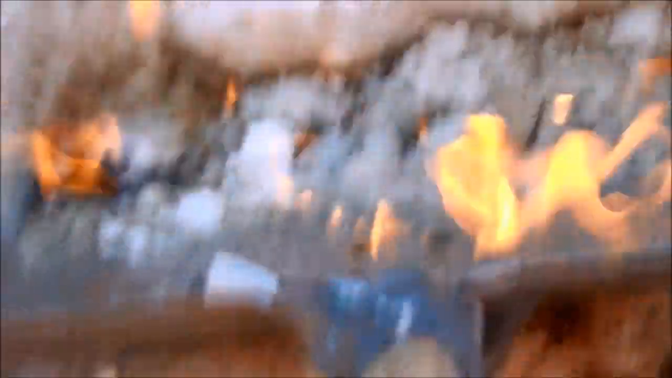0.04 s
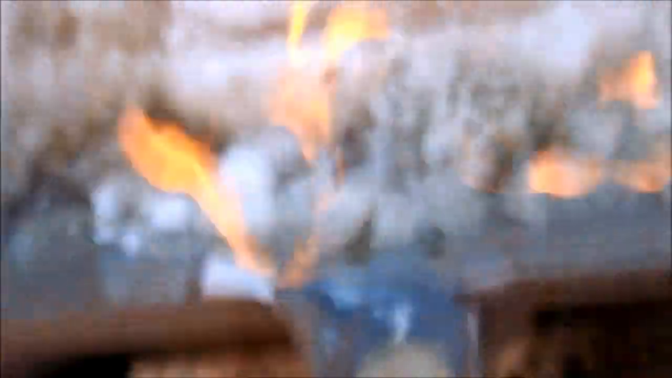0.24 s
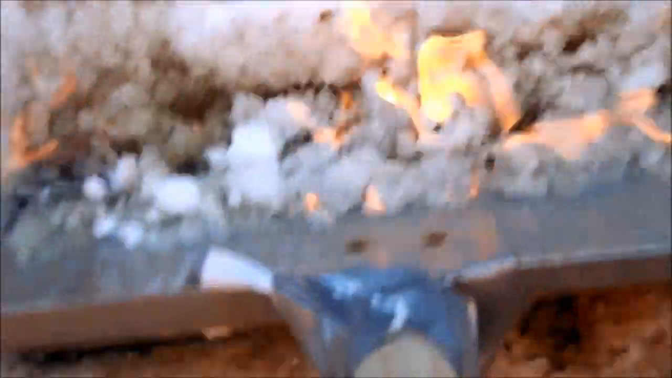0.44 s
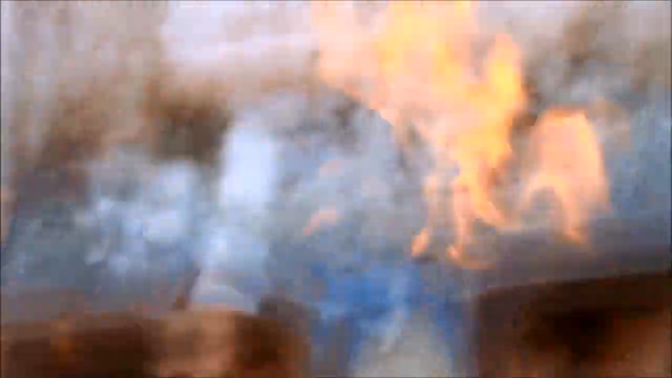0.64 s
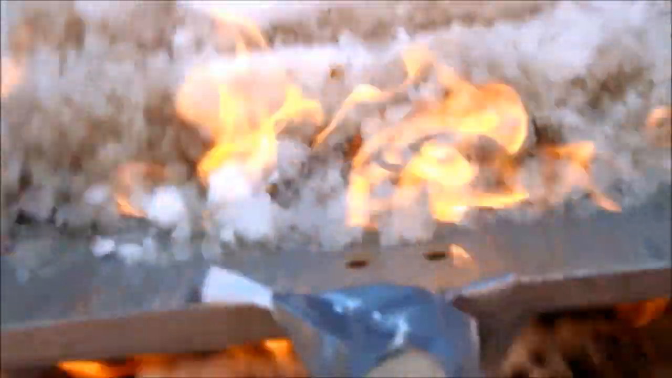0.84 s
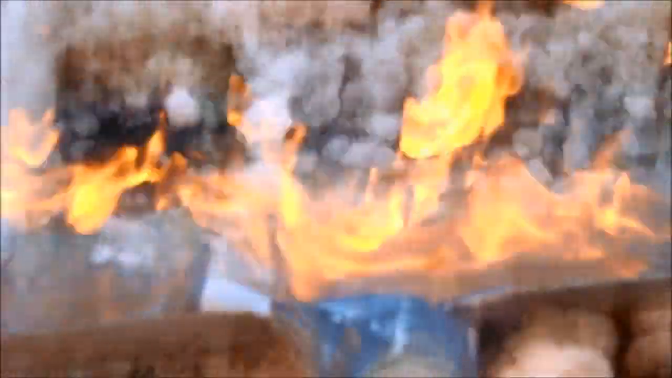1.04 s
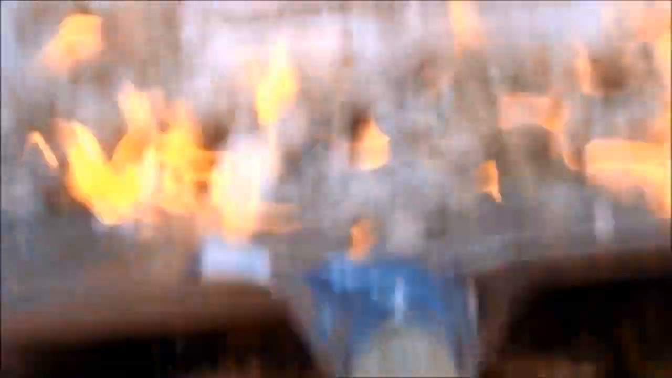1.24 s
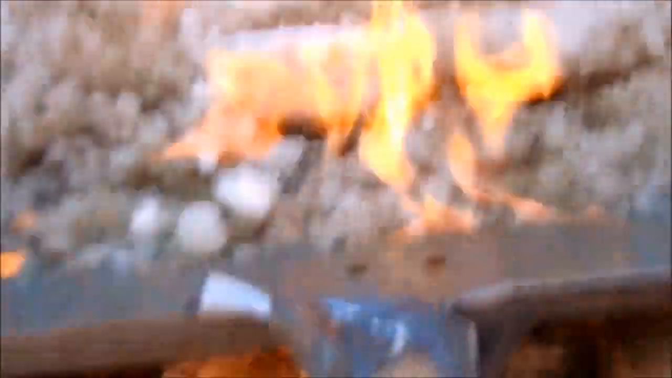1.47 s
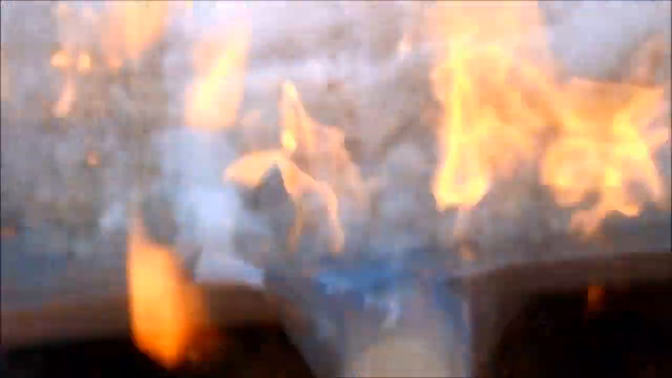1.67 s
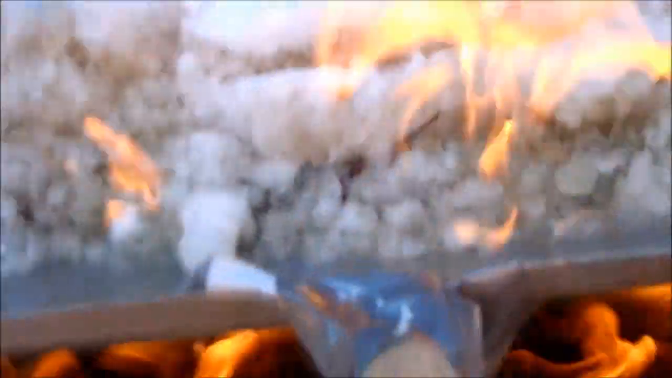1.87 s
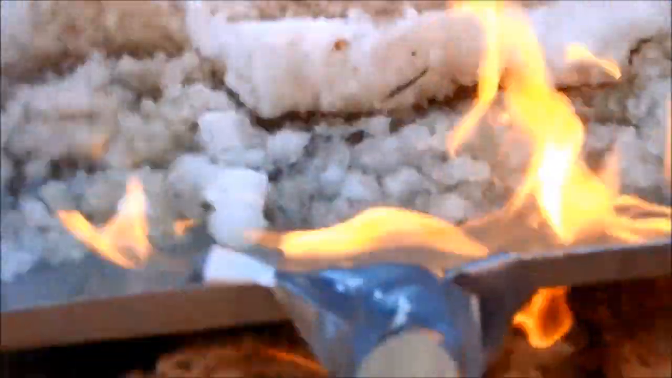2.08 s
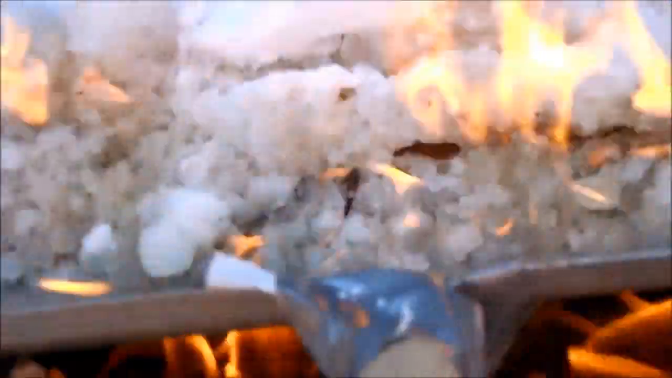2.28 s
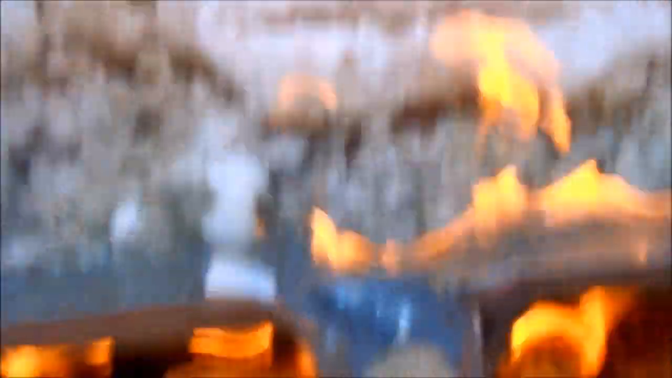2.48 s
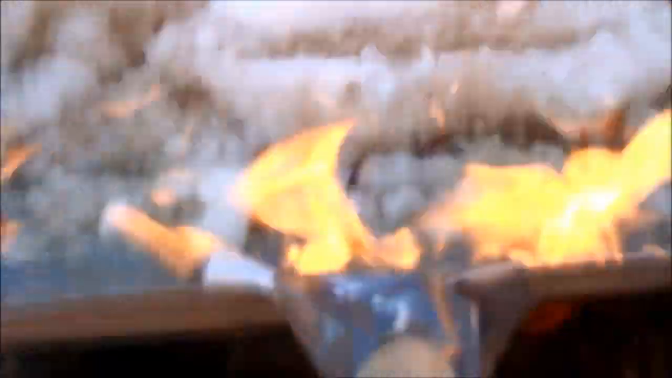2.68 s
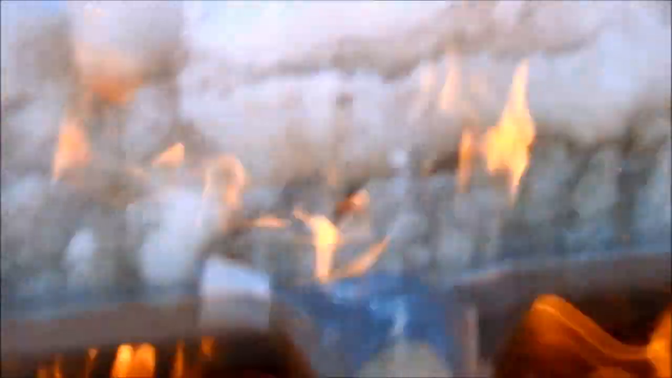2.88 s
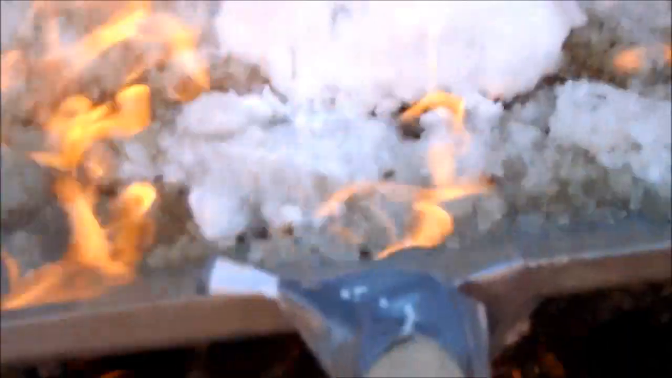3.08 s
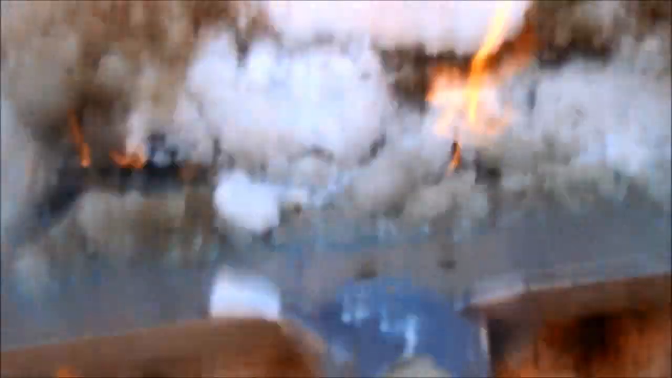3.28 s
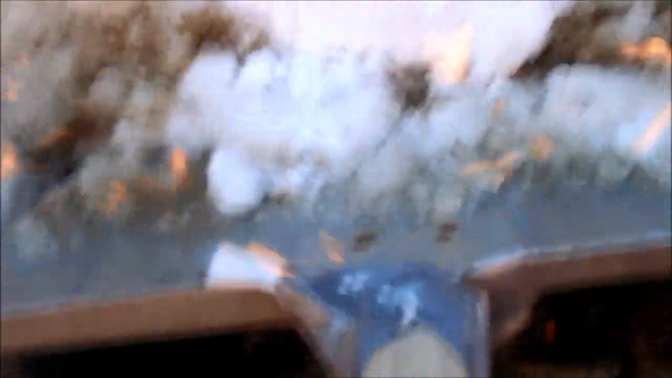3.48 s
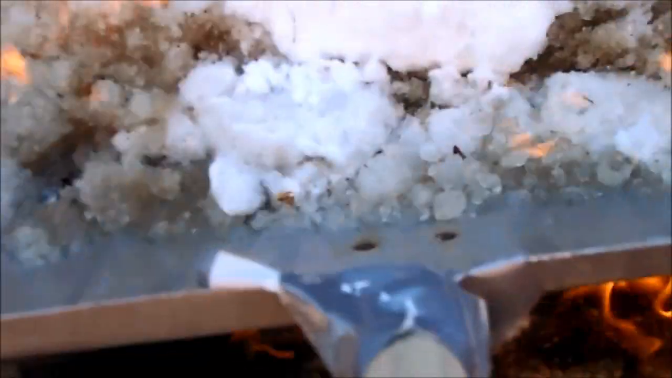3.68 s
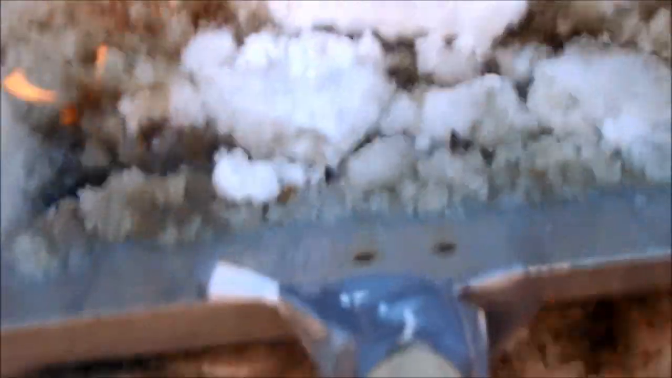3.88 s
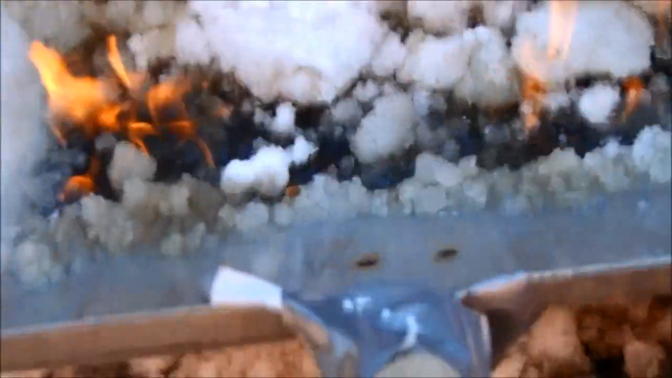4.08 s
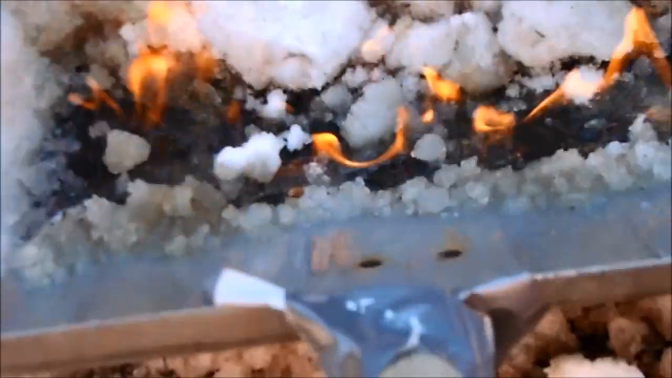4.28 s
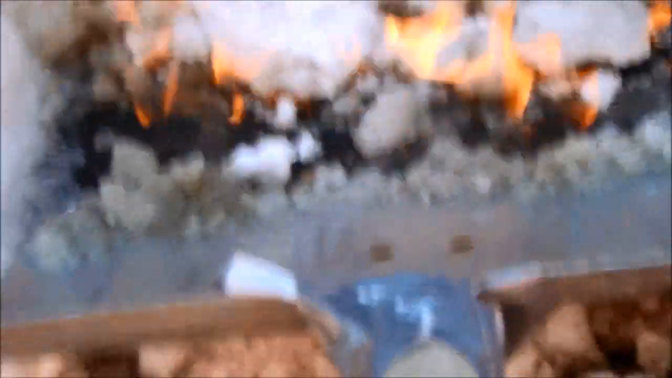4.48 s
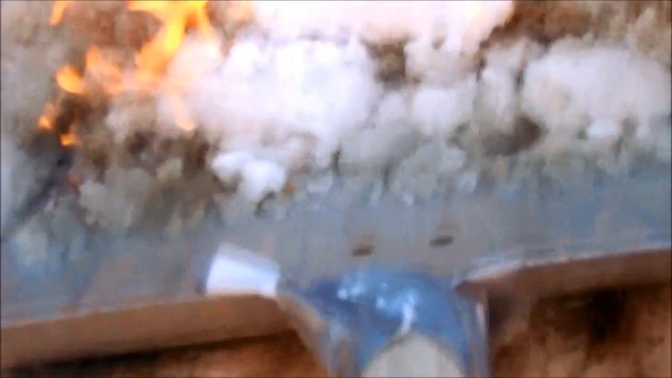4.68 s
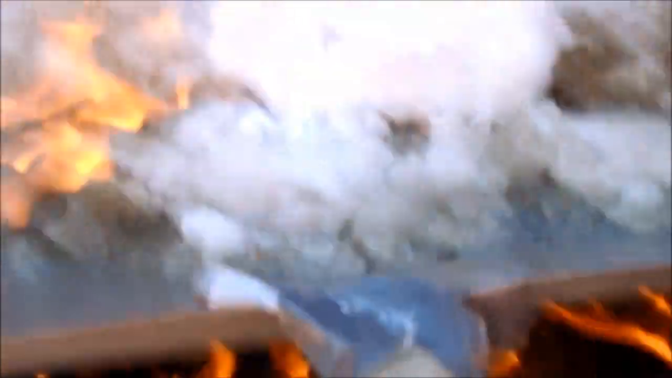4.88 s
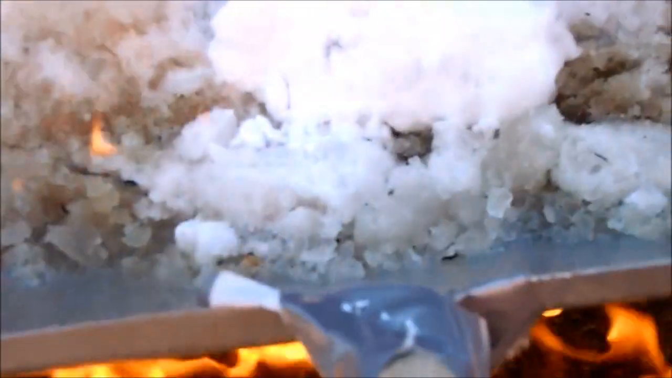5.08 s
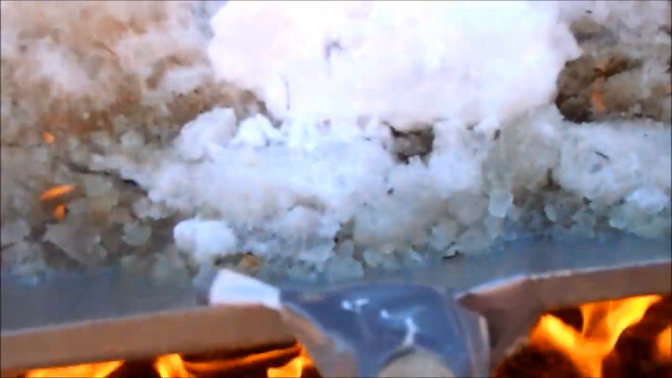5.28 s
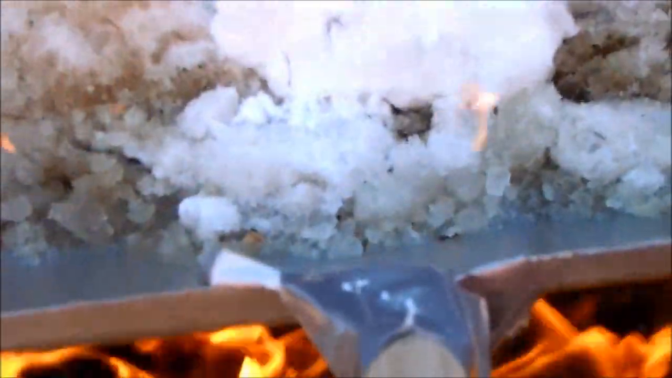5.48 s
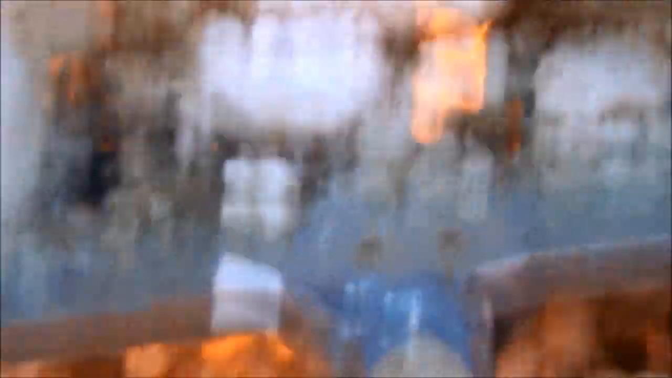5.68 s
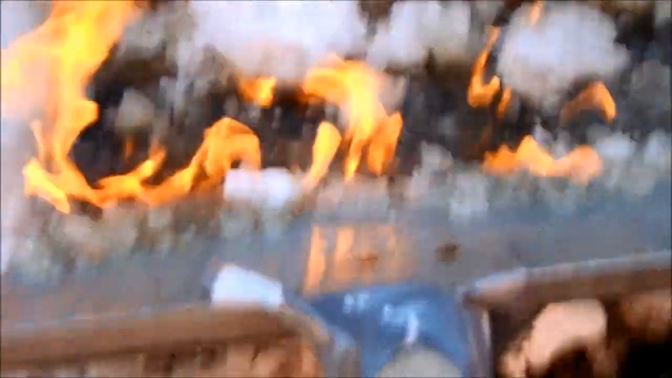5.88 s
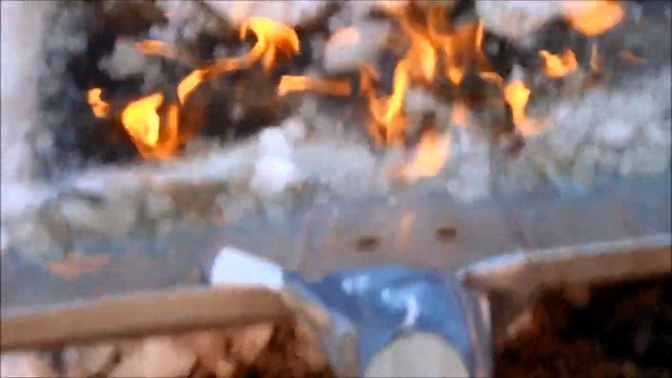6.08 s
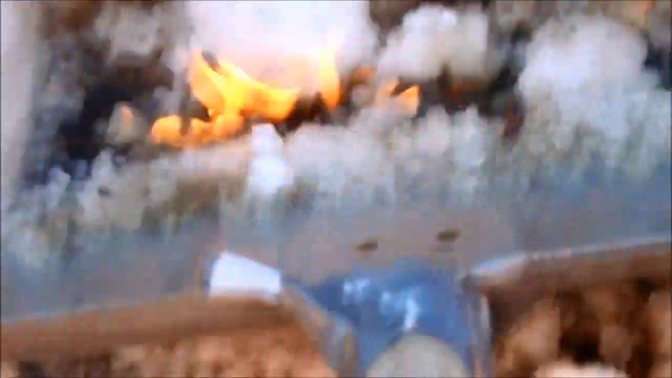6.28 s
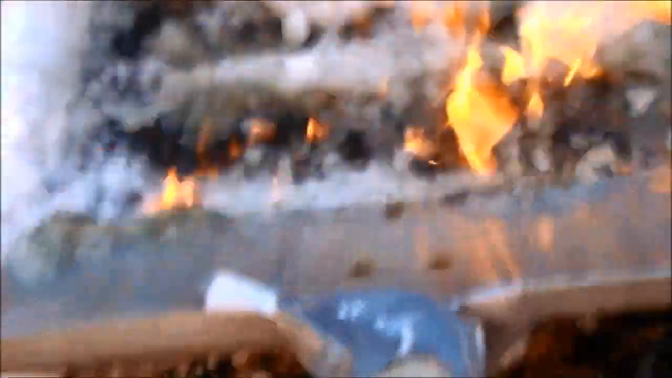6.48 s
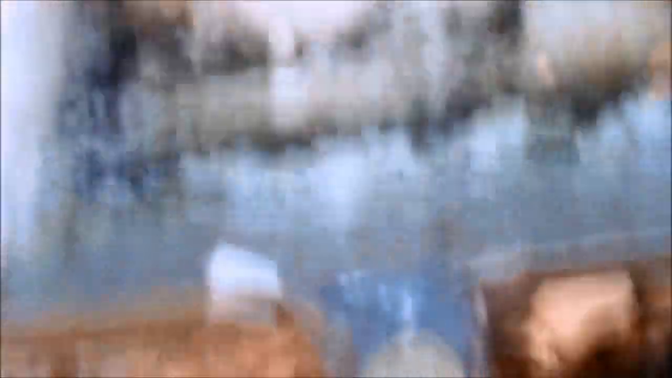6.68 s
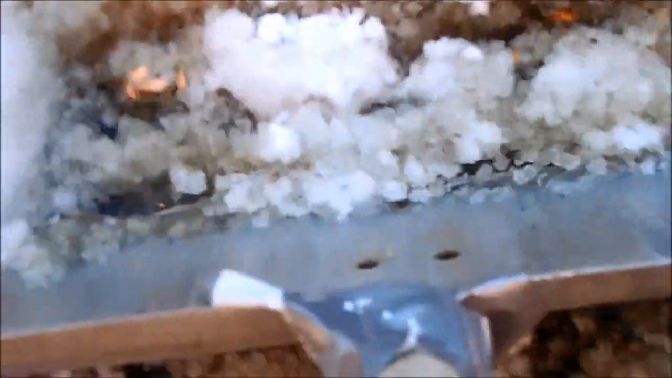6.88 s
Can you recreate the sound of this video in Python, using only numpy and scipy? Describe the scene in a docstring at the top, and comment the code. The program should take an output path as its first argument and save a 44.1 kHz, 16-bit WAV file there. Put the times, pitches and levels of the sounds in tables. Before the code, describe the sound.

Rapid jabs of a metal blade into granular ice, dry and close in open air. Crunching grains and powdery hiss ride over a short, damped metallic drone and low thumping rumble. The hardest clank comes about a third of the way in; later a long scrape leads to a pause with soft rising bird whistles, then further strokes finish with ice cracks and a strong crunch.

```python
"""A steel shovel is jabbed again and again into coarse, icy snow outdoors, close to a two-port microphone.
The crust crunches as bursts of breaking grains over powder hiss; the shaken blade drones in its resonances.
Hard lumps knock it, soft clods thud, ice snaps in bright bursts and crumbs tick.
Around the blade flames flutter as low noise; gusts buffet the ports. Behind, a distant bird whistles
gliding tones between pushes, over the quiet noise of open air."""
import sys
import numpy as np
from scipy import signal
from scipy.fft import rfft, irfft, next_fast_len
from scipy.io import wavfile
from scipy.ndimage import uniform_filter1d

SR = 44100
rng = np.random.default_rng(int(sys.argv[2]) if len(sys.argv) > 2 else 0)


def to_wav(sig):
    """Store sig (one row per channel, or 1-D mono) as 16-bit WAV at the path in sys.argv[1].

    Samples outside -1..1 are clipped; the rate is SR.
    """
    pcm = np.clip(np.atleast_2d(sig), -1, 1) * 32767
    pcm = np.round(pcm).astype(np.int16)
    wavfile.write(sys.argv[1], SR, pcm.T)  # frames by channels


N = 306054
TIME = np.arange(N) / SR
SIZE = next_fast_len(N + 4096)
BINS_HZ = np.maximum(np.arange(SIZE // 2 + 1) * SR / SIZE, 1)

# pushes of the shovel; rise and fall each span 20 dB of crunch:
# [t at full force/s, rise/s, fall/s, crunch level/dB, blade drone level/dB, rumble level/dB,
#  fineness of the snow as treble tilt/dB per octave]
PUSHES = [(0.156, 0.16, 0.063, -30, -30, -27, 0), (0.353, 0.11, 0.061, -21.5, -23.5, -25, 0),
          (0.601, 0.14, 0.12, -26, -26.5, -30.5, 0.4), (0.796, 0.079, 0.08, -16, -17, -21.5, -0.5),
          (1.028, 0.093, 0.058, -27.0, -27, -28.5, 3.0), (1.083, 0.02, 0.17, -26, -25, -30, 1.5),
          (1.364, 0.19, 0.093, -21, -21.5, -21, -0.3), (1.6, 0.12, 0.111, -30, -30.5, -30.5, 1.3),
          (1.822, 0.17, 0.061, -26.5, -28, -25.0, -1.1), (2.109, 0.17, 0.081, -31, -31, -32, 2.2),
          (2.307, 0.12, 0.075, -23.5, -23.0, -22.5, -0.5), (2.555, 0.104, 0.016, -33.5, -36, -29.5, -0.3),
          (2.635, 0.097, 0.075, -27, -28, -27.5, -0.2), (2.858, 0.15, 0.094, -27, -23, -23.5, -1.5),
          (3.122, 0.12, 0.101, -20.5, -22.5, -27, 0.6), (3.387, 0.12, 0.081, -29, -26, -26, 1),
          (3.606, 0.124, 0.051, -27.5, -27, -27, 1.2), (4.023, 0.11, 0.21, -33, -32, -33.5, 0.5),
          (4.135, 0.11, 0.21, -38.5, -30, -34.5, 2), (4.267, 0.0093, 0.23, -48, -43, -39.5, 3.5),
          (4.546, 0.072, 0.067, -34.5, -29.0, -30.0, 1.2), (4.693, 0.067, 0.33, -26.5, -24, -28.5, 1.4),
          (5.024, 0.25, 0.046, -19.5, -27.5, -32.5, -1.2), (5.806, 0.16, 0.16, -25.5, -24, -25.5, 1),
          (6.166, 0.2, 0.044, -39, -35.5, -31.5, 1), (6.385, 0.15, 0.038, -25.5, -21, -26, 0.6),
          (6.482, 0.138, 0.228, -38, -39.5, -32, 1.3), (6.683, 0.13, 0.014, -25.5, -24.5, -38, -1.3),
          (6.848, 0.14, 0.15, -20, -17.5, -22, 1.2)]
# the edge catches and breaks free, the crust gives way, blade and shaft shudder:
# [t/s, drone level/dB, crunch level/dB]
JOLTS = [(0.09, -29, -32), (0.159, -20.5, -33), (0.777, -20, -26), (1.086, -17.5, -21.5), (1.276, -19, -34),
         (1.82, -25, -36), (2.026, -26.5, -30.5), (2.297, -8.5, -17), (2.531, -20.5, -32),
         (2.862, -17, -18), (3.05, -25, -39), (4.283, -25.5, -46), (4.526, -20.5, -28), (4.653, -28, -38),
         (4.71, -17, -24), (4.79, -25, -43), (5.031, -17, -21.5), (5.743, -18, -18.5),
         (6.664, -15.5, -17.5)]
# spectrum of the crunching snow: [f/Hz, relative density level/dB]
CRUNCH_SPECTRUM = [(300, -8), (800, -0.5), (1300, -2), (2000, -2), (3000, 1), (4100, -2.5), (5200, -1.5),
                   (6500, -3), (8500, -2), (11000, -3.5), (14000, -7.5)]
# resonances of the blade, damped by its load of snow:
# [f/Hz, width/Hz, relative level when rubbed/dB, relative level when struck/dB]
BLADE = [(143, 107, -4, -18), (239, 165, -3.5, -26), (375, 64, -3.5, -20), (495, 82, -2.5, -26),
         (613.5, 58, 3, -17), (644, 89, 1, -18), (759, 88, -2, -11), (817, 78, -4, -30),
         (1032, 170, -8.5, -31), (1350, 213, -13, 0), (1830, 340, -14, -7.5), (2610, 870, -26, -1.5),
         (3184, 96, -17.5, -8.5), (5000, 570, -24.5, -7)]
# the blade knocks on hard lumps: [t/s, relative level/dB, shove against the ring/dB]
KNOCKS = [(0.0883, -12.5, -29), (0.1577, -13.5, -8), (0.7872, -6, -11), (1.277, 1, -16), (1.2941, -8, -13),
          (1.308, -5.5, -25), (1.3196, -8, -12), (1.3472, -13, -3), (1.3598, -5, -14), (1.8201, -6, 0),
          (2.032, -11, 0), (2.127, -13.5, 2), (2.2973, -10, 5.5), (2.3031, 4, -13), (2.3082, -3, -4),
          (2.3127, 0, -13), (2.858, -0.5, -1), (2.8914, -6.5, -6), (2.91, -11.5, -10), (4.134, -14.5, 6),
          (5.0318, -1.5, -9), (5.7492, 1, -14), (6.829, -3.5, -23)]
# soft clods of snow bump the blade: [t/s, level/dB]
THUDS = [(1.19, -11), (2.326, -13), (4.131, -19), (6.543, -16.5)]
# ice snaps: [t/s, relative level/dB, dull knock against the bright crack/dB]
SNAPS = [(0.7213, -14, -9), (0.7862, 0, -11), (0.9443, -19, -9), (1.0735, -6, -6), (1.2676, -1, 1),
         (1.937, -20.5, 5.5), (1.962, -31, 5), (2.301, -7, 4), (2.379, -21.5, 4), (2.45, -26, -2),
         (2.856, -5, -10), (2.924, -14, 4), (2.9711, -20.5, -2), (3.019, -16.5, -11), (3.047, -13, -7),
         (3.759, -27, 4), (4.21, -16, -13), (4.275, -18, -10), (4.522, -7.5, -8), (4.5337, -8, -6),
         (4.583, -19.5, -6), (4.6178, -19.5, -10), (4.653, -15, -11), (5.18, -36, 11), (5.23, -29.5, -10),
         (5.277, -25.5, -15), (5.3, -30, -14), (5.55, -39.5, 14), (5.675, -15, -1), (5.7458, -8, -4),
         (5.8864, -12.5, 5), (5.981, -17, -11), (6.5298, -12, 1), (6.5457, -8, -20), (6.588, -10, -12),
         (6.628, -9, -6), (6.6555, 4, -10), (6.668, 0.5, -16), (6.7215, -8.5, -1)]
# spectrum of flames and rumble: [f/Hz, relative density level/dB]
FLAMES_SPECTRUM = [(12, 0.5), (25, -2), (45, -1), (70, 2.5), (100, -3), (160, -7.5), (240, -9.5),
                   (400, -18), (900, -35)]
# gusts on the microphone ports: [t at the top/s, rise/s, fall/s, level/dB]
GUSTS = [(1.36, .12, .25, -31), (1.68, 0.17, .15, -33.5), (3.82, 0.081, 0.26, -32.5),
         (6.17, 0.093, 0.17, -32), (6.6, .2, 0.27, -32)]
# spectrum of the wind buffeting: [f/Hz, relative density level/dB]
BUFFET_SPECTRUM = [(12, 8), (30, 14.5), (80, 0), (150, 1), (280, -13), (700, -40), (2000, -60)]
# distant bird, one table per whistle: [t/s, pitch f/Hz, mean level/dB]
WHISTLES = [
    [(3.465, 3150, -55), (3.485, 3450, -55), (3.51, 3750, -55)],
    [(3.775, 3400, -64), (3.79, 3560, -53), (3.805, 4200, -64)],
    [(3.82, 2580, -64), (3.85, 2780, -58), (3.868, 3060, -47), (3.895, 3300, -48), (3.93, 3700, -50),
     (3.96, 3850, -60)],
    [(5.18, 3600, -91), (5.195, 3920, -49), (5.208, 4150, -59)],
    [(5.215, 2630, -59), (5.252, 2880, -58), (5.275, 3220, -48), (5.32, 3600, -53), (5.36, 3900, -58),
     (5.388, 3940, -52), (5.405, 3450, -54), (5.43, 2840, -56)],
]
# spectrum of the open air: [f/Hz, relative density level/dB]
AIR_SPECTRUM = [(88, -29), (150, -2.5), (346, 1), (515, -13), (860, -7.5), (2490, -21), (3310, -17),
                (4320, -28), (7770, -34), (14000, -36)]
# stereo width at the microphone: [f/Hz, side against mid level/dB]
WIDTH = [(30, -18), (130, -18), (500, -22), (1000, -21), (1500, -2), (2000, -5), (3000, -9), (4000, -11),
         (5500, -7), (7100, -4), (8800, -6), (13000, -3)]
# colour of the two ports: [f/Hz, left minus right level/dB]
PORT_BALANCE = [(100, -1), (700, -0.5), (1400, -1), (1800, 1), (2700, -0.5), (5000, 0.5), (7500, -1.5),
                (10500, -3), (13000, 1)]

# the arm leans in smoothly and lets go more abruptly (1 = straight in dB, 2 = bell)
RISE_CURVE, FALL_CURVE = 2.47, 1.354
# share of the crunch's swing in dB that the blade's drone and the rumble follow
DRONE_FOLLOWS, RUMBLE_FOLLOWS = 1.01, 0.64
# between pushes snow trickles, the blade rests on it and the flames burn on
REST_CRUNCH_DB, REST_DRONE_DB, FLAMES_DB = -65, -59.5, -43.5
# a jolt rises and falls by 20 dB in these times; its rumble is set against its drone
JOLT_RISE_S, JOLT_FALL_S, JOLT_RUMBLE_DB = 0.016, 0.035, -1.5
SNAP_T60_S = 0.028
# chips: delay in fall times of the push, level against its crunch, scatter, dull against bright
CHIP_DELAY, CHIP_DB, CHIP_SCATTER_DB, CHIP_DULL_DB = 0.68, -4, -2, 5
AIR_DB = -54
CUTOFF_HZ = 14250


def effort():
    """Pushes and jolts add in power to set three levels in dB; tilt is averaged by crunch power."""
    grit, blade, low = power(REST_CRUNCH_DB), power(REST_DRONE_DB), power(FLAMES_DB)
    tilt = 0
    for s, rise_s, fall_s, crunch_db, drone_db, rumble_db, tilt_db in PUSHES:
        force_db = swell(s, rise_s, fall_s)
        cut = power(crunch_db + force_db)
        grit = grit + cut
        tilt = tilt + cut * tilt_db
        blade = blade + power(drone_db + DRONE_FOLLOWS * force_db)
        low = low + power(rumble_db + RUMBLE_FOLLOWS * force_db)
    for s, drone_db, crunch_db in JOLTS:
        away = np.maximum((s - TIME) / JOLT_RISE_S, (TIME - s) / JOLT_FALL_S)
        shudder = power(-20 * np.minimum(away, 10))
        grit = grit + shudder * power(crunch_db)
        blade = blade + shudder * power(drone_db)
        low = low + shudder * power(drone_db + JOLT_RUMBLE_DB)
    return 10 * np.log10(grit), 10 * np.log10(blade), 10 * np.log10(low), tilt / grit


def swell(s, rise_s, fall_s):
    """Shape of a push or gust in dB: a rounded climb to zero at time s, then a release."""
    before = np.maximum(s - TIME, 0) / max(rise_s, 0.005)
    after = np.maximum(TIME - s, 0) / max(fall_s, 0.005)
    return np.maximum(-20 * (before ** RISE_CURVE + after ** FALL_CURVE), -300)


def crunch(level_db, slip, tilt_db, grains_per_s=2000, powder=1.0, patchy_db=1.58, sparkle_db=1.0):
    """Ice grains break along the edge, faster under a harder push, over the hiss of sliding powder."""
    per_s = grains_per_s * from_db(0.41 * (level_db + 28.5))
    breaks = fractures(per_s, size_db=1.5, t60=0.002)
    # even out the strength over 50 ms, so that level_db sets it
    breaks = breaks / np.sqrt(np.maximum(uniform_filter1d(breaks ** 2, size=2205), 0) + 1e-4)
    grit = rms_one(colour(noise() * np.hypot(breaks, powder), CRUNCH_SPECTRUM))
    # coarse and fine grains come in clumps of their own: overlapping bands a third of an octave apart
    out = 0
    whole = rfft(grit, SIZE)
    octaves = np.clip(np.log2(BINS_HZ / 1000), 0, 4)
    for centre in np.linspace(0, 4, 13):
        weight = np.maximum(1 - 3 * abs(octaves - centre), 0)
        band = irfft(whole * weight, SIZE)[:, :N]
        clumps_db = patchy_db * drift(29) + sparkle_db * drift(107)
        out = out + band * from_db(clumps_db + tilt_db * (centre - 2.5))
    return spread(out * slip * from_db(level_db))


def drone(level_db, slip, wander_db=3.0):
    """The edge catches and slips and shakes the blade; wandering contact favours changing resonances."""
    force = noise() * fractures(700, size_db=1.0, t60=0.0048) * slip
    body = 0
    for k, (hz, width_hz, rubbed_db, _) in enumerate(BLADE):
        gain = from_db(rubbed_db + wander_db * drift(14.7))
        body = body + (-1) ** k * gain * resonate(force, hz, width_hz)   # neighbours in opposite phase
    return spread(rms_one(body) * from_db(level_db))


def crumbs(crunch_db, level_db=-10):
    """Loosened pellets tumble over the blade with each push; each ticks drily, at one of four pitches by chance."""
    per_s, settle_t60, tick_t60 = 110, 0.06, 0.008
    # tumbling lags behind the crunch
    stirred = fade(from_db(crunch_db), settle_t60) * np.log(1000) / (settle_t60 * SR)
    sizes = (rng.random(N) < per_s / SR) * from_db(4 * np.minimum(rng.exponential(1, N), 2.5))
    pitch_class = rng.integers(0, 4, N)
    out = 0
    for k, hz in enumerate(np.geomspace(3500, 10000, num=4)):
        contact = noise() * fade(sizes * (pitch_class == k), tick_t60)
        out = out + resonate(contact, hz, hz) / np.sqrt(hz)
    return spread(rms_one(out) * stirred * from_db(level_db))


def knocks(ring_db=13, chatter=0.37, chatter_t60=0.016, shove_t60=0.035, shove_hz=900, shove_low_hz=90):
    """A lump stops the blade: one blunt shove, and a very short chatter of steel on ice rings it."""
    hits, shoves = np.zeros((2, N))
    for s, db, shove_db in KNOCKS:
        at = round(s * SR)
        hits[at] += from_db(db)
        shoves[at] += from_db(db + shove_db)
    # the blow itself drives only the middle, the chatter both middle and side
    force = chatter * noise() * fade(hits, chatter_t60) - hits * [[1], [0]]
    ring = sum(from_db(struck_db) * resonate(force, hz, width_hz) for hz, width_hz, _, struck_db in BLADE)
    # the blade's upper ring reaches the two ports out of step
    side = colour(ring[1], [(900, -11), (1500, -1.0)])
    blunt = signal.butter(1, [shove_low_hz, shove_hz], "band", fs=SR, output="sos")
    shove = signal.sosfilt(blunt, fade(shoves, shove_t60))
    return from_db(ring_db) * (ring[0] + side * [[1], [-1]]) - shove


def thuds(hz=235, t60=0.023):
    """A soft clod sets only one low flexing of the blade going: a decaying sine."""
    hits = np.zeros(N)
    for s, db in THUDS:
        hits[round(s * SR)] = from_db(db)
    age = TIME[:SR // 8]
    flex = -np.sin(2 * np.pi * hz * age) * from_db(-60 * age / t60)
    return signal.fftconvolve(hits, flex)[:N]


def snaps(trim_db=-7, low_hz=3400, high_hz=10500, dull_hz=1800, dull_width_hz=1500):
    """A piece of ice cracks: a bright burst that dies within milliseconds, duller for thick pieces."""
    bright, dull = np.zeros((2, N))
    for s, db, dull_db in SNAPS + chips():
        at = round(s * SR)
        age = TIME[:min(SR // 8, N - at)]
        burst = from_db(db - 60 * age / SNAP_T60_S) * (1 - np.exp(-age / 0.0002))
        bright[at:at + len(age)] += burst
        dull[at:at + len(age)] += burst * from_db(dull_db)
    treble = signal.butter(1, [low_hz, high_hz], "band", fs=SR, output="sos")
    crack = signal.sosfilt(treble, noise() * bright)
    knock = resonate(noise() * dull, dull_hz, dull_width_hz)
    return from_db(trim_db) * spread(crack + knock)


def chips(count=2):
    """A few chips drop off at random moments as each push dies away: rows like those of SNAPS."""
    rows = []
    for s, _, fall_s, crunch_db, *_ in PUSHES:
        for late, size in rng.uniform(-1, 1, (count, 2)):
            at_s = s + fall_s * CHIP_DELAY * (1 + late / 2)
            rows.append((at_s, crunch_db + CHIP_DB + CHIP_SCATTER_DB * size, CHIP_DULL_DB))
    return [row for row in rows if row[0] < TIME[-1]]


def rumble(level_db, shaft_hz=72, shaft_width_hz=22, shaft=0.44):
    """Flames flutter as low noise, and each push shakes the shaft at its low resonance."""
    air = colour(noise(), FLAMES_SPECTRUM)
    low = rms_one(air + shaft * resonate(air, shaft_hz, shaft_width_hz))
    # the push, more than chance, sets how strong it is (evened out over 79 ms)
    low = low / np.sqrt(uniform_filter1d(low[0] ** 2, size=3500) + 0.063)
    return spread(low * from_db(level_db))


def breeze(gust_db=3):
    """Gusts press on the ports as lumpy low buffeting, different at each."""
    gust_power = sum(power(db + swell(s, rise_s, fall_s)) for s, rise_s, fall_s, db in GUSTS)
    buffeting = colour(noise(), BUFFET_SPECTRUM) * from_db(gust_db * drift(10))
    return rms_one(buffeting) * np.sqrt(gust_power)


def bird(echo_db=-5, echo_t60=0.4):
    """Pure, mostly upward slurs, trailed by decaying scatter from the surroundings."""
    song = np.zeros(N)
    for rows in WHISTLES:
        hz, level_db = in_time(rows)
        gate = np.clip(np.minimum(TIME - rows[0][0], rows[-1][0] - TIME) / 0.008, 0, 1)   # 8 ms ramps
        tone = np.sin(2 * np.pi * np.cumsum(hz) / SR)
        song += gate * from_db(level_db + 2.6 * drift(70)) * tone
    scatter = rng.standard_normal((2, SR // 2)) * from_db(-60 * TIME[:SR // 2] / echo_t60)
    scatter /= np.sqrt(np.sum(scatter[0] ** 2))
    echo = signal.fftconvolve(song[None], scatter, axes=1)[:, :N]
    return song + from_db(echo_db) * echo


def open_air(width=0.22):
    """The quiet outdoor background: steady coloured noise, a little wide."""
    mid, side = rms_one(colour(noise(), AIR_SPECTRUM))
    return from_db(AIR_DB) * (mid + width * side * [[1], [-1]])


def from_db(db):
    """Decibels to gain."""
    return 10 ** (np.asarray(db) / 20)


def power(db):
    """Decibels to power, in which overlapping sounds add."""
    return 10 ** (db / 10)


def rms_one(x):
    """Scale to unit rms."""
    return x / np.sqrt(np.mean(x ** 2) + 1e-20)


def in_time(rows):
    """Each column of a curve over time, joined by straight lines."""
    s, *columns = np.transpose(sorted(map(tuple, rows)))
    return [np.interp(TIME, s, column) for column in columns]


def noise():
    """Two unrelated white noises."""
    return rng.standard_normal((2, N))


def drift(rate_hz):
    """Slow chance with a spread of one: noise smoothed by two equal low-passes."""
    r = np.exp(-2 * np.pi * rate_hz / SR)
    white = rng.standard_normal(N + SR)
    return rms_one(signal.lfilter([1], [1, -2 * r, r * r], white)[SR:])   # the first second settles


def fractures(per_s, size_db, t60):
    """Envelope of random breaks, many small and a few large, each dying quickly."""
    born = rng.random(N) < per_s / SR
    sizes = from_db(size_db * np.minimum(rng.exponential(1, N), 4))
    return rms_one(np.sqrt(fade(born * sizes ** 2, t60 / 2)))   # the breaks add in power


def fade(x, t60):
    """Every click gets an exponential tail that falls 60 dB in t60 seconds."""
    return signal.lfilter([1], [1, -np.exp(-np.log(1000) / (t60 * SR))], x + 1e-18)


def resonate(x, hz, width_hz):
    """One resonance with unit gain at its top."""
    r = np.exp(-np.pi * width_hz / SR)
    zeros = np.array([1, 0, -1]) * (1 - r * r) / 2
    poles = [1, -2 * r * np.cos(2 * np.pi * hz / SR), r * r]
    return signal.lfilter(zeros, poles, x + 1e-18)


def colour(x, points):
    """Filter by a smooth spectrum of (f/Hz, level/dB) points."""
    hz, db = np.transpose(points)
    gain = from_db(np.interp(np.log(BINS_HZ), np.log(hz), db))
    return irfft(rfft(x, SIZE) * gain, SIZE)[..., :N]


def spread(pair):
    """Two unrelated signals become left and right: alike in the bass, further apart in the treble."""
    side = colour(pair[1], WIDTH)
    return np.array([pair[0] + side, pair[0] - side])


def scene():
    """The shovel in front, flames around it, open air and a bird behind."""
    crunch_db, drone_db, rumble_db, tilt_db = effort()
    slip = from_db(0.8 * drift(78))   # the crust gives way unevenly
    scrape = crunch(crunch_db, slip, tilt_db) + drone(drone_db, slip) + crumbs(crunch_db)
    impacts = knocks() + thuds() + snaps()
    surroundings = rumble(rumble_db) + breeze() + bird() + open_air()
    left, right = scrape + impacts + surroundings
    # the two ports differ a little in colour
    left_colour = [(hz, db / 2) for hz, db in PORT_BALANCE]
    right_colour = [(hz, -db / 2) for hz, db in PORT_BALANCE]
    return np.array([colour(left, left_colour), colour(right, right_colour)])


def record(dry):
    """The microphone overloads softly on the loudest peaks; a steep low-pass cuts the top."""
    clipped = dry / (1 + dry ** 6) ** (1 / 6)
    top_cut = signal.ellip(14, 0.1, 100, CUTOFF_HZ, fs=SR, output="sos")   # 0.1 dB ripple, 100 dB stop
    return signal.sosfilt(top_cut, clipped)


dry = scene()
out = record(dry)
to_wav(out)
```